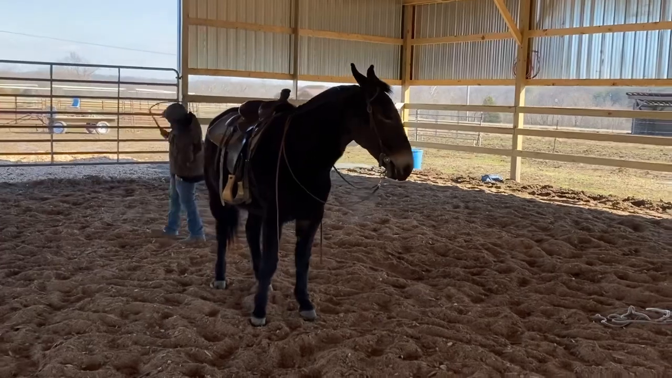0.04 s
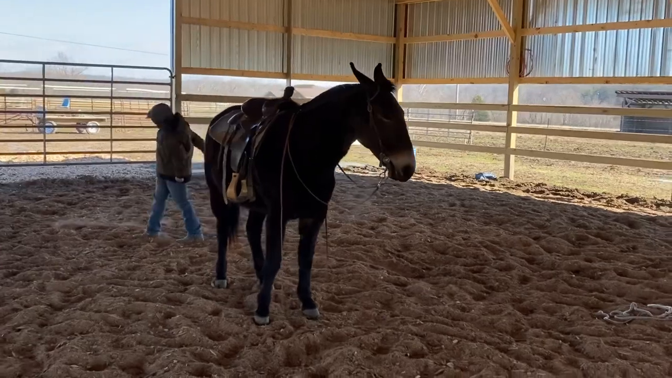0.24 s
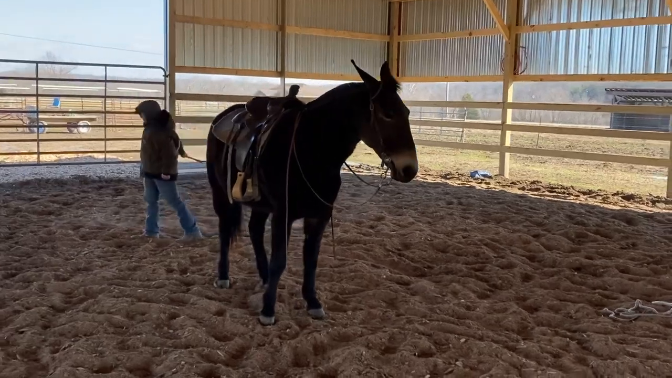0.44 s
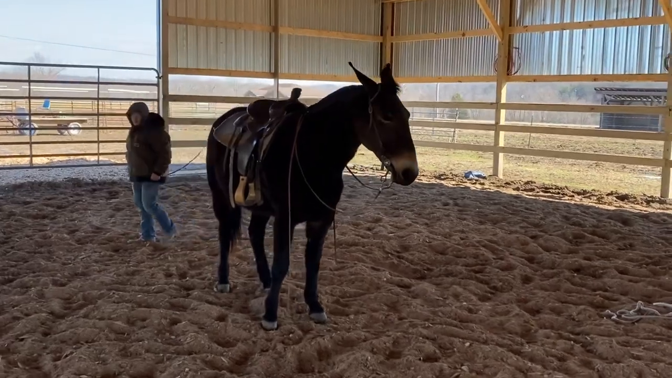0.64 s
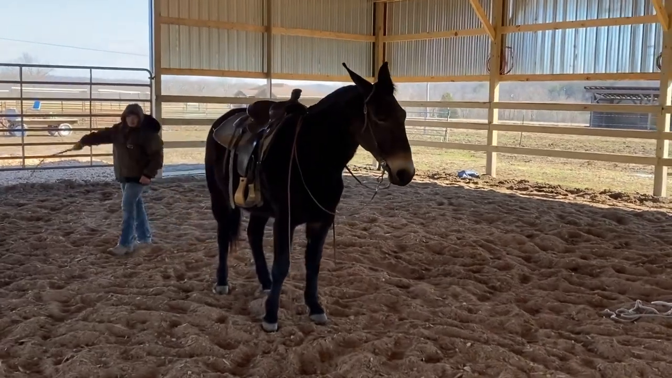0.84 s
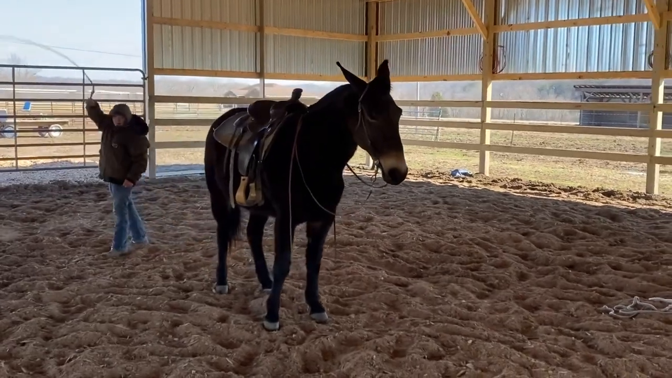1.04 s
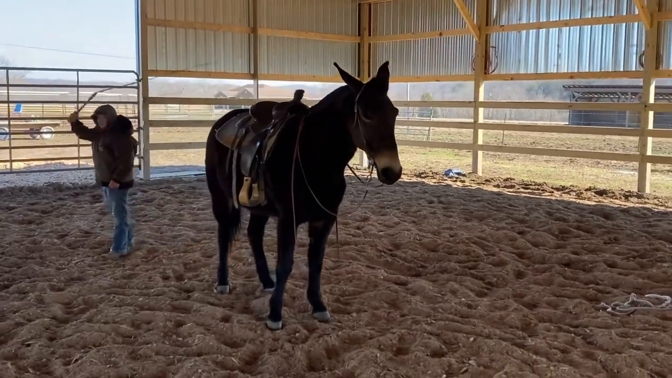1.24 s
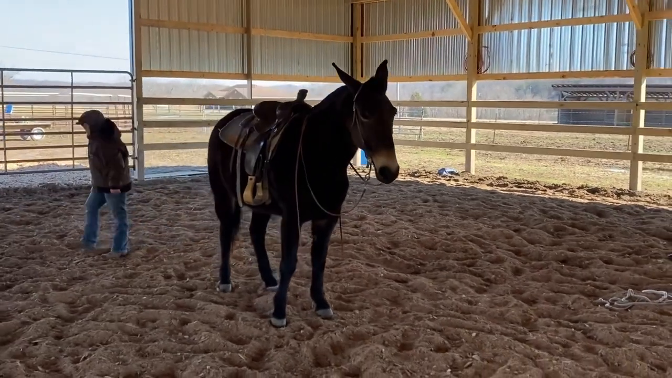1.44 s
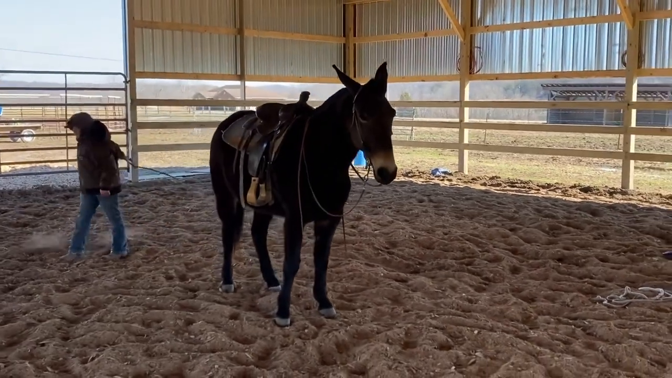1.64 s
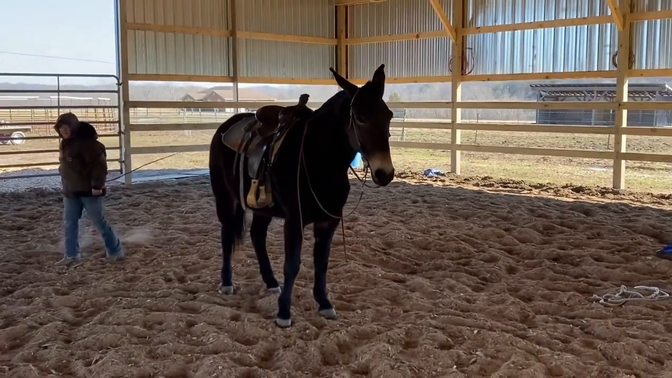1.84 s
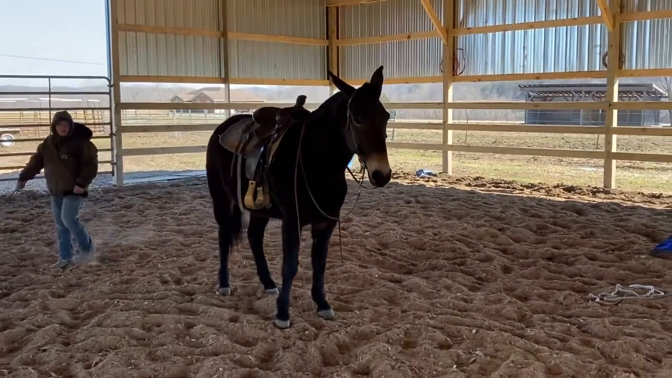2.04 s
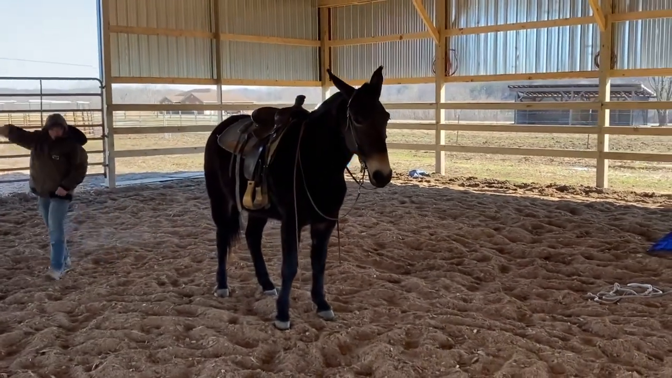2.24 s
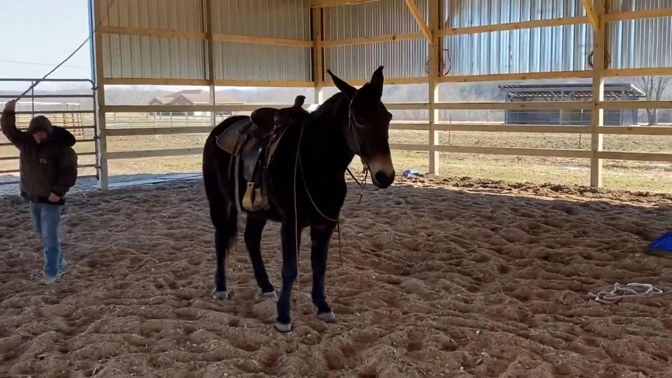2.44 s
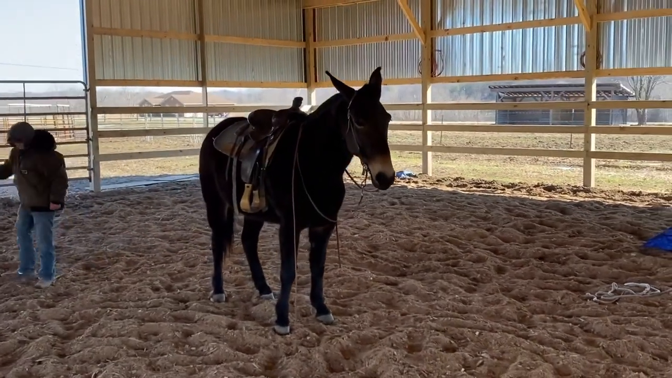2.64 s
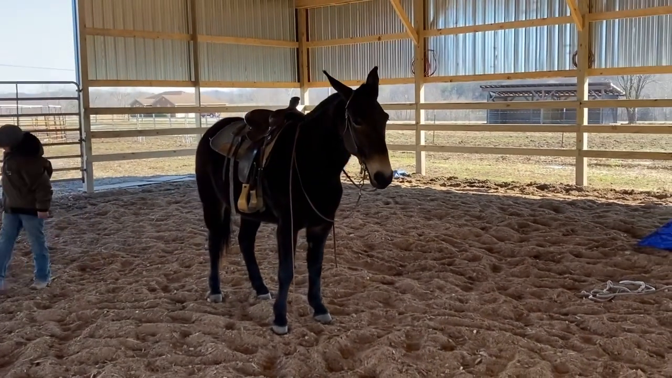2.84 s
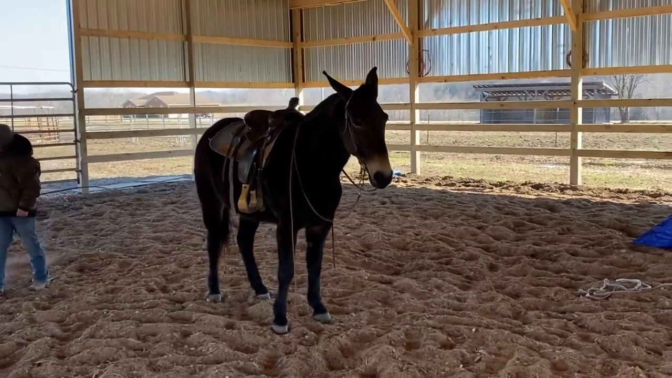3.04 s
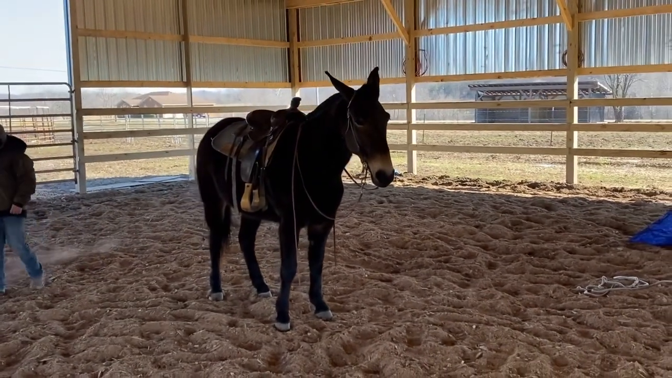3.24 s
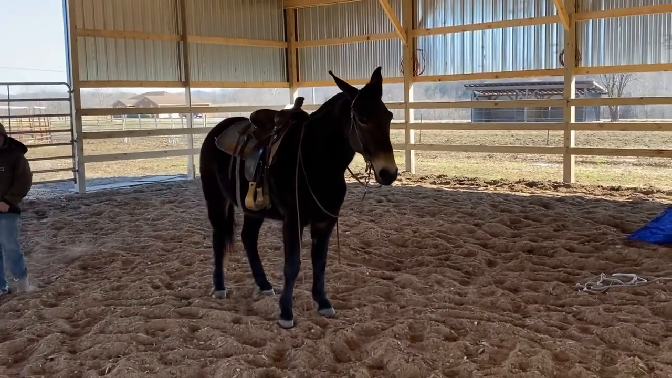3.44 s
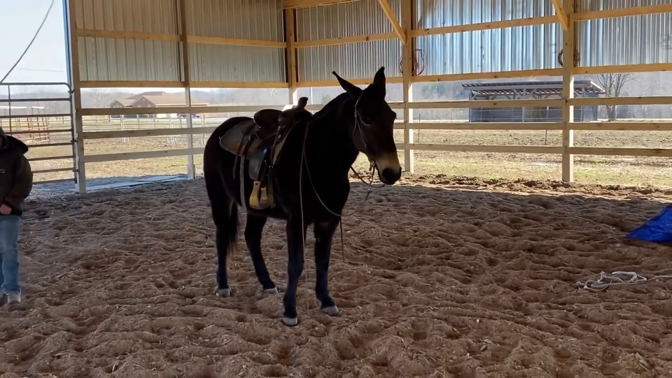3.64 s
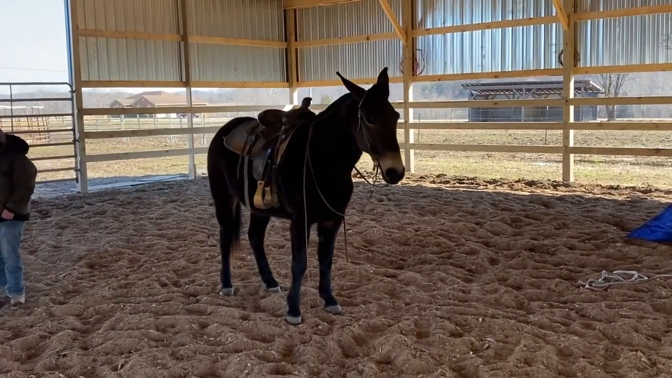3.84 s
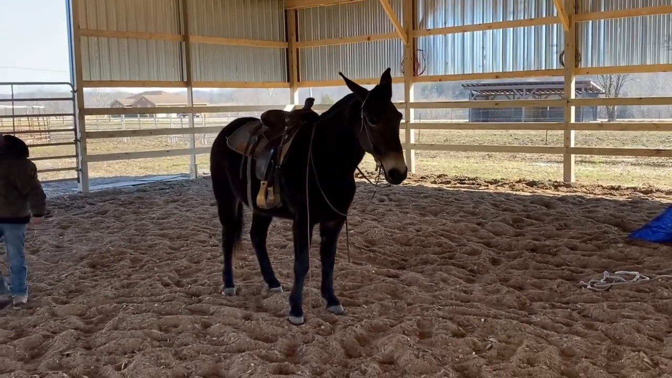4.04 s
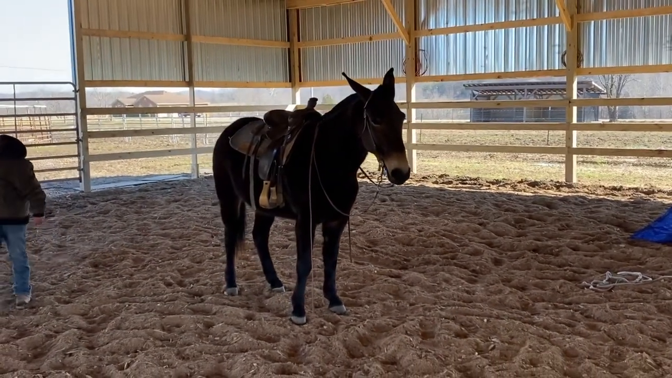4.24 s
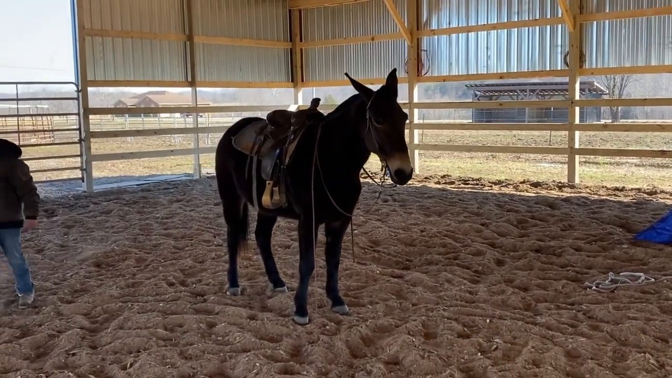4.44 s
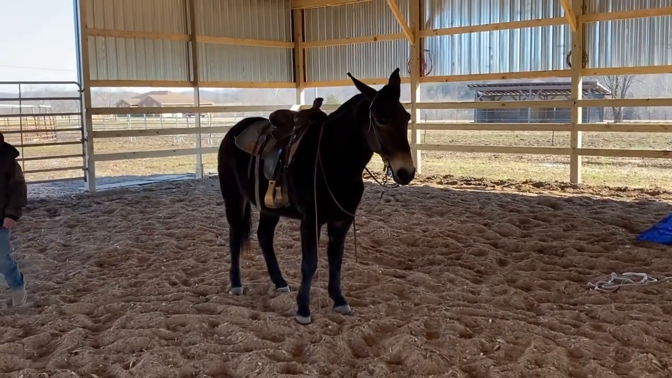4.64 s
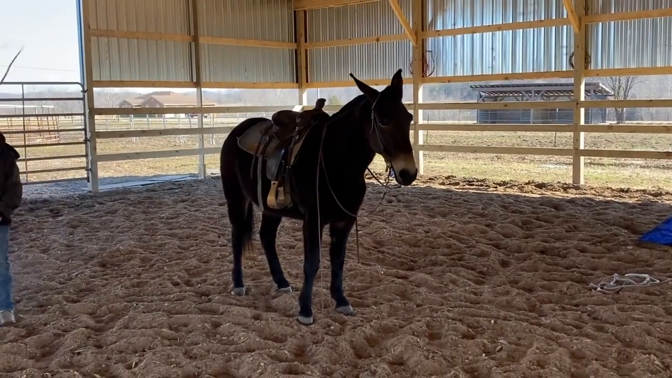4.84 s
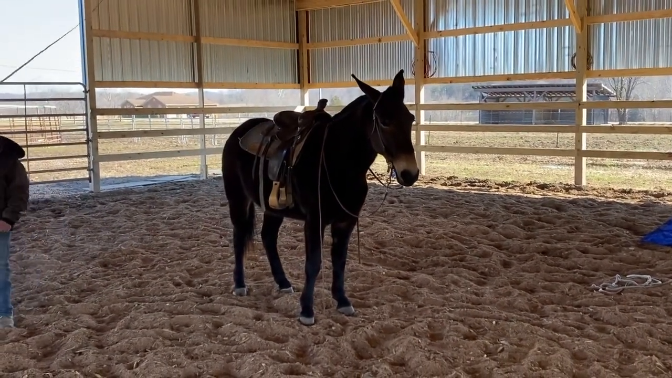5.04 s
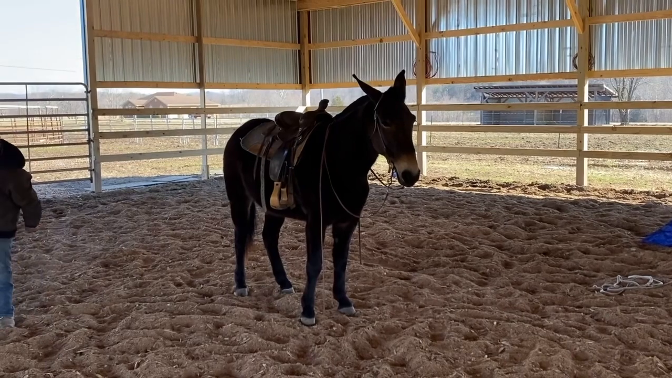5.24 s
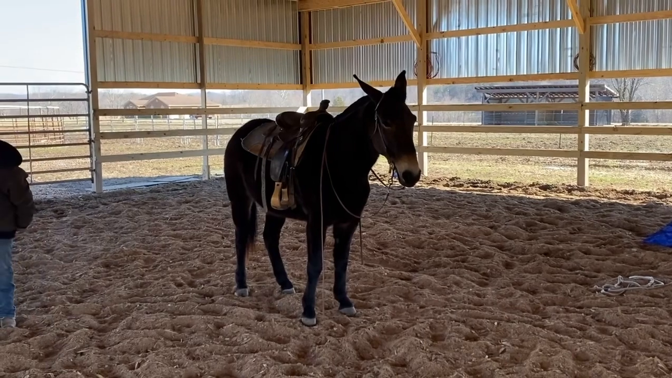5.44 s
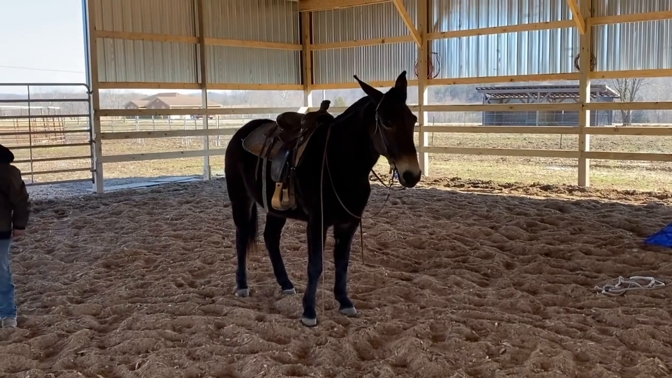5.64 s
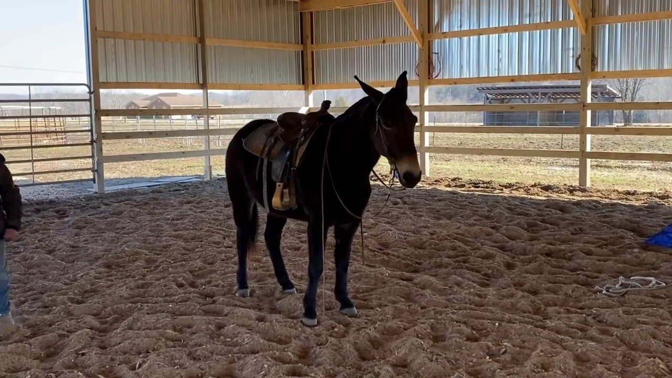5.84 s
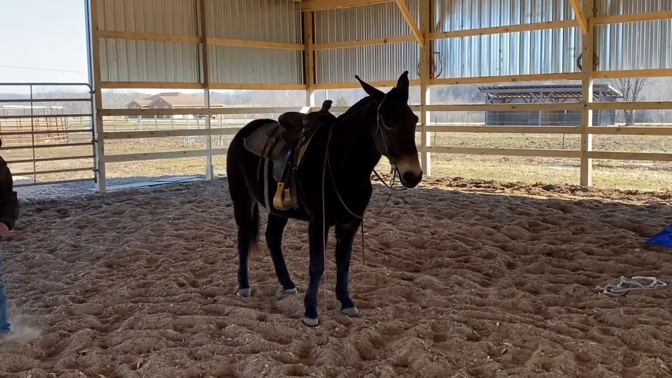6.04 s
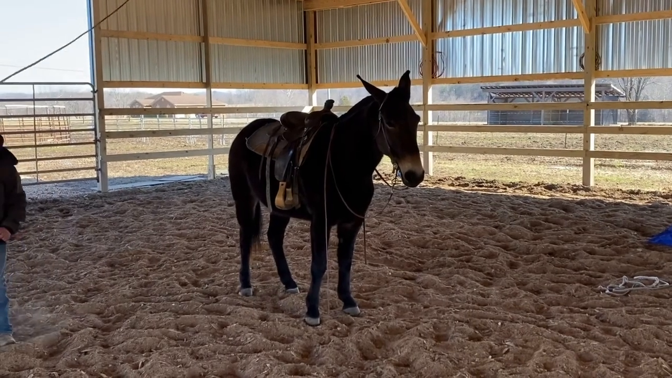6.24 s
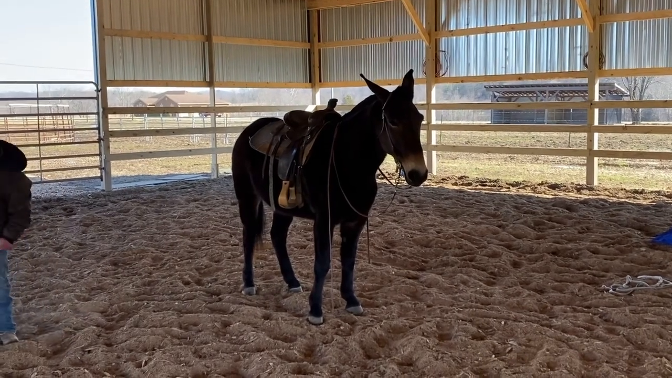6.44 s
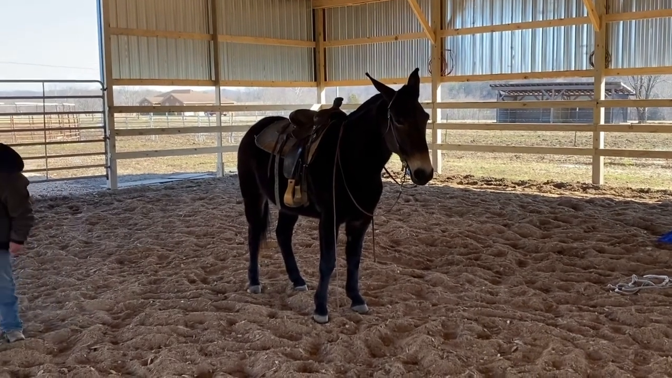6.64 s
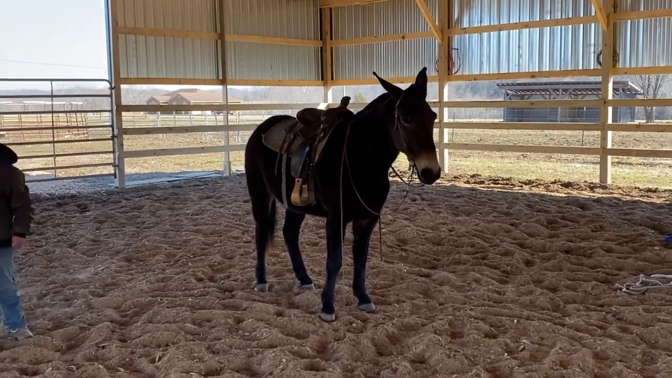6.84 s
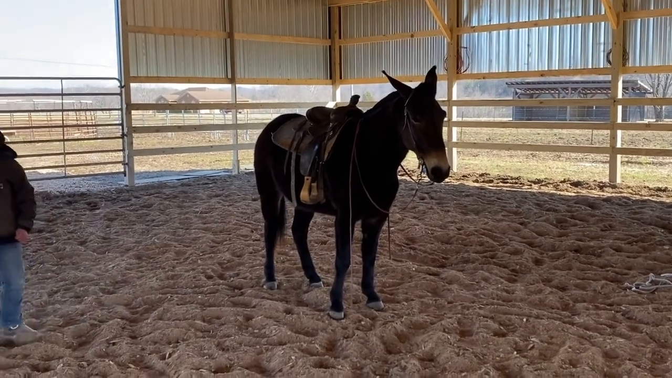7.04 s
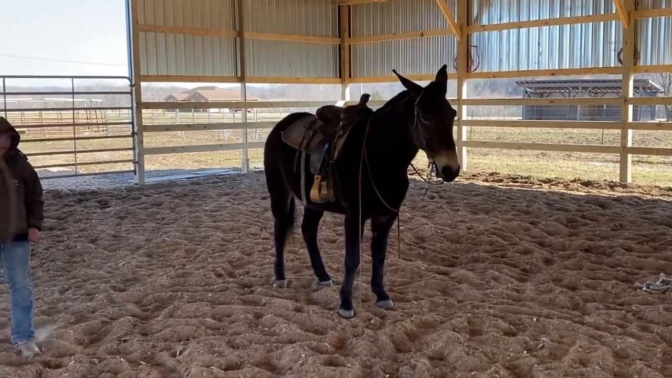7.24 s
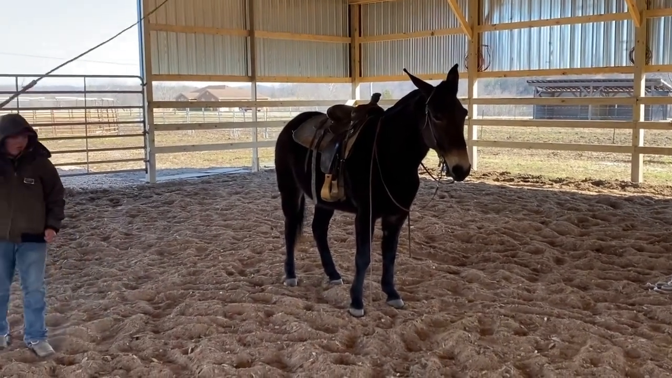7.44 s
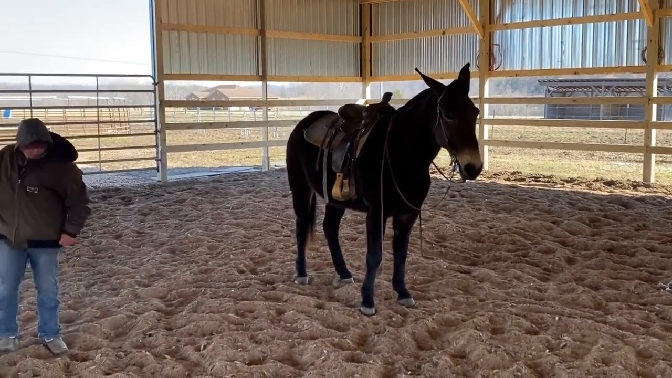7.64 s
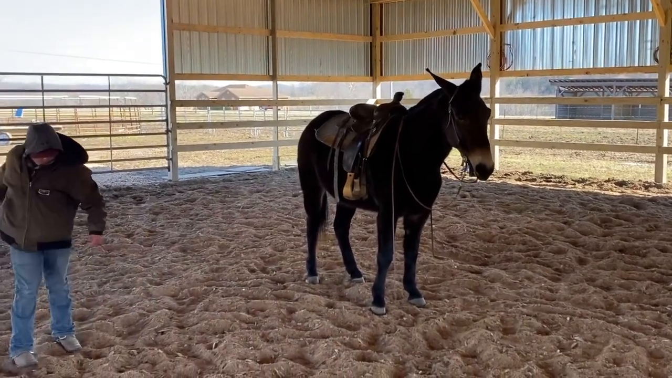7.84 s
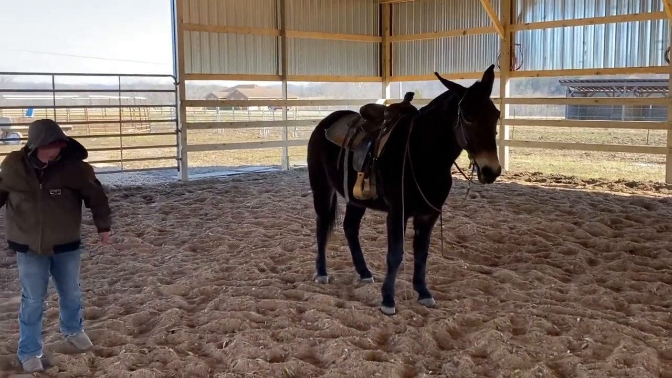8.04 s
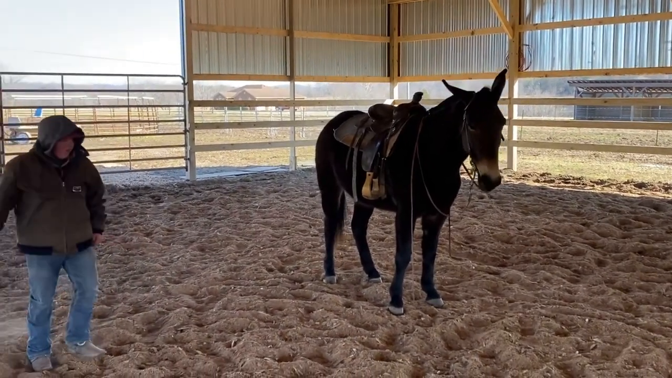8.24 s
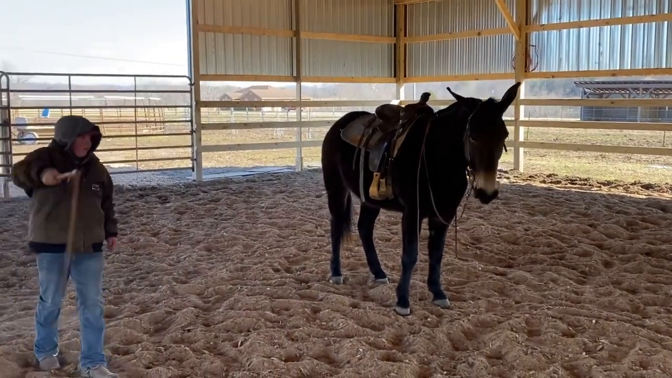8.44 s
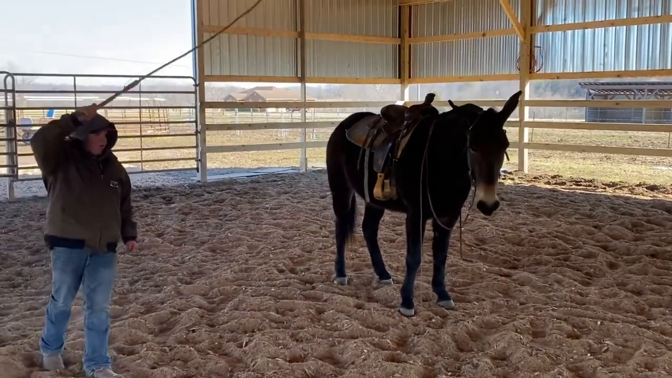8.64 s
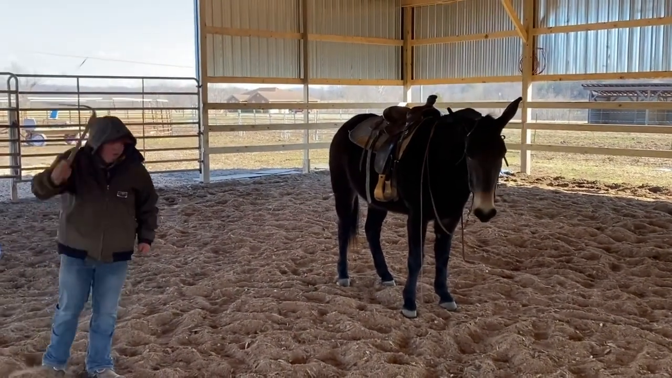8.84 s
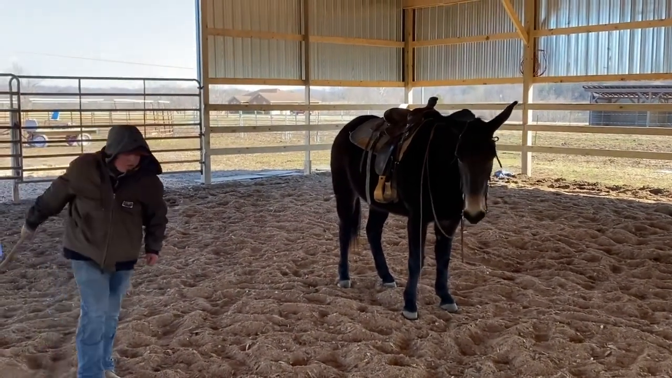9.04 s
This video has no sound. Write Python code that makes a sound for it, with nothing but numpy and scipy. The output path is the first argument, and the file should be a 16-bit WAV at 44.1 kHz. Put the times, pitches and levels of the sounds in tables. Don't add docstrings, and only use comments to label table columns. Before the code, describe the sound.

In an open-sided riding arena with a metal roof, a backswing swish is under way and leads to a loud whip crack at 0.16 seconds, with rapid echoes and a bright ring. A light flick follows at 0.84, a soft whoosh, then a double-edged crack at 1.41. The cycle repeats: flick at 2.1, crack at 2.74 with a heavy sand thump; flick at 3.4, crack at 3.97 with the deepest thump; faint flick at 4.64, brighter split crack at 5.25; flick at 5.95, crack at 6.51; dull flick at 7.12, crack at 7.72; faintest flick at 8.37, longer hiss and clustered crack at 8.97. Each ring returns in waves off walls and roof, fading within about half a second. Tiny grit ticks, low wind puffs, strongest near 3.2 to 3.5, and faint rural hush lie underneath.

```python
import sys
import numpy as np
from scipy import signal
from scipy.fft import rfft, irfft, next_fast_len
from scipy.io import wavfile
from scipy.ndimage import uniform_filter1d, map_coordinates

SR = 44100
rng = np.random.default_rng(int(sys.argv[2]) if len(sys.argv) > 2 else 0)


def makeup_ratio(level_db):
    decades = np.asarray(level_db, float) / 20
    return 10 ** decades


def inscribe(sig):
    pcm = np.round(np.clip(np.atleast_2d(sig).T, -1, 1) * 32767)
    wavfile.write(sys.argv[1], SR, pcm.astype(np.int16))


N = 401310
STEP = 32


def at_hz(points, hz):
    table_hz, value = np.transpose(points)
    return np.interp(np.log(hz + 1), np.log(table_hz + 1), value)


def over_time(points):
    return np.interp(np.arange(N) / SR, *np.transpose(points))


def rms_one(x):
    return x / np.sqrt(np.mean(x ** 2) + 1e-20)


def band(x, low_hz, high_hz):
    return signal.sosfilt(signal.butter(2, [low_hz, high_hz], "band", fs=SR, output="sos"), x)


def drift(rate_hz):
    knots = rng.standard_normal(int(N / SR * 60))
    at = np.arange(0, N + STEP, STEP)
    return np.interp(np.arange(N), at, map_coordinates(knots, [at / SR * rate_hz], order=3))


def add(out, s, sound):
    i = round(s * SR)
    out[..., i:i + sound.shape[-1]] += sound[..., :N - i]


# [f/Hz, level/dB per Hz]
HUSH_COLOUR = [(88, -32), (150, -5.5), (595, -4.5), (1090, -14), (7130, -23), (8330, -28), (9180, -29),
               (10700, -19), (13300, -27), (15500, -25.5)]
# [t/s, level/dB]
HUSH_SWELL = [(.75, 3), (1.15, -4), (1.35, -4), (2.05, 0), (2.4, -1), (2.65, -1), (3.7, -1), (3.9, 0),
              (4.58, 4), (4.93, -3), (5.12, -1), (5.75, 0), (5.9, -3), (6.0, 1), (6.1, 1), (6.25, 1),
              (6.35, 1), (7.4, -1), (7.62, -2), (8.68, -2), (8.85, 1)]


def hush():
    hz = np.fft.rfftfreq(N, 1 / SR)
    level_db = -70 + over_time(HUSH_SWELL) + 2.8 * drift(7)
    spectrum = rfft(rng.standard_normal((2, N))) * makeup_ratio(at_hz(HUSH_COLOUR, hz)) * (hz > 150)
    return makeup_ratio(level_db) * rms_one(irfft(spectrum, N))


# [t/s, level/dB]
BREEZE = [(0.0, -50), (0.81, -66), (1.65, -65), (1.8, -67), (2.69, -62.5), (2.84, -54.5), (3.83, -56.5),
          (4.05, -54), (4.54, -61), (5.22, -67), (5.37, -57), (5.78, -63), (6.44, -58.5), (6.59, -54.5),
          (7.5, -67.5), (7.91, -66.5), (8.06, -69), (9.1, -68)]


def breeze():
    rumble = rms_one(band(band(rng.standard_normal((2, N)), 33, 130), 33, 99))
    return makeup_ratio(over_time(BREEZE) + 2.5 * drift(14)) * rumble


# [start t/s, length/s, level/dB and eddy f/Hz at full speed]
BACKSWINGS = [
    (-.2, 0.36, -52.5, 597),
    (.88, 0.57, -61, 780),
    (2.14, 0.51, -64, 750),
    (3.42, 0.23, -61, 604),
    (3.57, 0.39, -65, 700),
    (4.72, 0.45, -70.5, 708),
    (5.97, 0.52, -66, 891),
    (7.149, 0.38, -68, 750),
    (8.42, 0.4, -67.5, 750),
]
# [start t/s, length/s, level/dB and eddy f/Hz at full speed]
DOWNSWINGS = [
    (.0, 0.16, -58, 700),
    (1.24, 0.24, -56.5, 650),
    (2.52, 0.46, -56.5, 650),
    (3.8, .17, -59.5, 650),
    (5.05, 0.22, -65, 650),
    (6.33, 0.41, -60.5, 600),
    (7.53, 0.39, -62.5, 650),
    (8.78, 0.37, -58, 700),
    (8.55, .5, -69, 520),
]


def whoosh(t, hz, wander, lumps):
    power = np.zeros(len(t))
    swings = [r + (1, .45) for r in BACKSWINGS] + [r + (.55, 1) for r in DOWNSWINGS]
    slowest = .6
    for s, length, level_db, top_hz, arc, skew in swings:
        now = (t >= s) & (t < s + length)
        speed = np.sin(np.pi * arc * ((t[now] - s) / length) ** skew).clip(0)
        eddy_hz = top_hz * (slowest + (1 - slowest) * speed)
        octaves = np.log2(hz / eddy_hz) + .1 * wander[now]
        eddies_db = np.where(octaves < 0, 5 * octaves, -28 * octaves)
        air_hiss_db = -19.5 - 2.5 * octaves.clip(0)
        colour = makeup_ratio(eddies_db) ** 2 + makeup_ratio(air_hiss_db) ** 2
        power[now] += makeup_ratio(level_db) ** 2 * speed ** 3.7 * colour
    return power * makeup_ratio(1.6 * lumps) ** 2


# [t/s, near level/dB, far level/dB, far delay/s, brightness/dB per octave]
LASH_RINGS = [
    (.168, -21.5, -44.5, 0.19, -0.3),
    (1.428, -26.5, -43.5, .18, -0.4),
    (2.756, -30.5, -42, .19, -0.63),
    (3.988, -31.5, -43.5, 0.16, -0.5),
    (5.267, -35, -42.5, 0.15, 0.46),
    (6.526, -31, -46, 0.14, -0.8),
    (7.732, -34.5, -44.5, 0.13, -0.45),
    (8.992, -37, -44.5, 0.13, 0.3),
]
SCATTERS_DB = [-27, -20.5, -24.5, -25, -30.5, -25, -29, -35]
# [t/s, level/dB,
# brightness/dB per octave]
FLICK_RINGS = [(0.001, -72, -2), (0.852, -62, -0.2), (.975, -70.5, -5), (2.128, -62, 2), (2.242, -70.5, -4),
               (3.394, -61, 0.8), (3.497, -66, -4), (4.646, -62, 2), (4.76, -67, -3), (5.949, -62, -2),
               (6.04, -72, -3), (2.3, -75, -3), (7.125, -66.5, -0.9), (7.24, -72, -4.5), (8.369, -67, -1.1),
               (8.485, -71.5, -5)]
# [f/Hz, level/dB per third octave]
SCATTER = [(170, -16), (300, -12.5), (700, -13), (1200, -6.5), (2300, 2), (4000, -1), (6500, -7),
           (12000, -14)]
NEAR = [(200, -23.5), (700, -16), (1200, -8.5), (2300, 1), (4000, 0), (5600, -5.5), (8000, -4.5),
        (12000, -7.5)]
FAR = [(200, -22), (700, -11), (1200, -6.5), (2300, -0.5), (4000, -2), (5600, -9.5), (8000, -11.5),
       (12000, -17)]
FLICK_FIELD = [(170, -11.5), (300, -6), (700, -3), (1200, -2.5), (2300, -0.5), (4000, -2), (6500, 1),
               (12000, 2)]
# [f/Hz, t60/s]
NEAR_T60 = [(300, 0.93), (1000, 0.7), (3000, .55), (7000, .48), (11000, .42), (15000, .4)]
FAR_T60 = [(300, 1), (1000, .78), (3000, .77), (5500, .68), (8000, .68), (11000, .63), (15000, .58)]
FLICK_T60 = [(300, .4), (1000, 0.25), (3000, 0.45), (7000, 0.41), (12000, .4)]
# [t after ring start/s, level/dB, spread/s]
WAVES = [
    (.088, 2.5, .013),
    (.14, -2, .025),
    (.21, 1.5, .03),
    (.345, 1.5, .012),
    (.41, -1.5, .04),
]


def ringing(t, hz):
    power = np.zeros(len(t))
    scatter_t60_s, far_rise_s, far_hold_s = .07, .038, .046
    for (s, near_db, far_db, far_s, bright_db), scatter_db in zip(LASH_RINGS, SCATTERS_DB):
        age = t[t >= s] - s
        scatter = makeup_ratio(scatter_db + at_hz(SCATTER, hz) - 60 * age / scatter_t60_s) ** 2
        near = makeup_ratio(near_db + at_hz(NEAR, hz) - 60 * age / at_hz(NEAR_T60, hz)) ** 2
        arrived = 1 / (1 + np.exp((far_s - age) / far_rise_s))
        far_age = (age - far_s - far_hold_s).clip(0)
        far = arrived * makeup_ratio(far_db + at_hz(FAR, hz) - 60 * far_age / at_hz(FAR_T60, hz)) ** 2
        waves_db = sum(db * np.exp(-((age - at) / spread) ** 2) for at, db, spread in WAVES)
        brightness = makeup_ratio(bright_db * np.log2(hz / 2500)) ** 2
        power[t >= s] += (far + (scatter + near) * brightness) * makeup_ratio(waves_db) ** 2
    for s, level_db, bright_db in FLICK_RINGS:
        fall_db = 60 * (t[t >= s] - s) / at_hz(FLICK_T60, hz)
        start_db = level_db + at_hz(FLICK_FIELD, hz) + bright_db * np.log2(hz / 2500)
        power[t >= s] += makeup_ratio(start_db - fall_db) ** 2
    return power


def clumped(white):
    spectra = signal.stft(white, nperseg=512)[2]
    patches = uniform_filter1d(rng.standard_normal(spectra.shape[-2:]), size=2, axis=0)
    patches = uniform_filter1d(patches, size=3, axis=1)
    return signal.istft(spectra * makeup_ratio(1.5 * rms_one(patches)), nperseg=512)[1][..., :N]


def arena():
    t = np.arange(0, N, STEP) / SR
    wander, lumps = drift(14)[::STEP], drift(30)[::STEP]
    white, flutter = clumped(rng.standard_normal((2, 2, N))), drift(45)
    out = 0
    for k, low in enumerate(140 * 2 ** (np.arange(21) / 3)):
        high = min(low * 2 ** (1 / 3), 16800)
        hz = np.sqrt(low * high)
        power = ringing(t, hz) + whoosh(t, hz, wander, lumps)
        gain = np.interp(np.arange(N) / SR, t, np.sqrt(power))
        patch_db = .5 * flutter + .55 * drift(18)
        out = out + gain * makeup_ratio(patch_db) * rms_one(band(white[k % 2], low, high))
    return out


# [start t/s, length/s, level/dB, top f/Hz]
PUFFS = [(.06, 0.096, -56, 130), (.8, 0.19, -57, 220), (1.074, 0.19, -52.5, 109), (1.552, 0.14, -55, 130),
         (2.053, .17, -54, 230), (3.2, 0.12, -47.5, 108.7), (3.327, 0.13, -49.5, 266),
         (3.461, .2, -48.5, 126), (4.619, 0.1, -54.5, 220), (5.94, .15, -55.5, 226),
         (6.137, 0.063, -54, 166), (7.081, .13, -52, 201), (7.333, 0.055, -56, 120),
         (8.251, 0.19, -60, 200), (8.695, 0.095, -60, 107)]


def puffs():
    out = np.zeros((2, N))
    for s, length, level_db, top_hz in PUFFS:
        noise = band(band(rng.standard_normal((2, SR // 2)), 40, top_hz), 30, top_hz)
        noise = noise[:, -int(length * SR):]
        swell = np.sin(np.pi * np.linspace(0, 1, noise.shape[1]))
        add(out, s, makeup_ratio(level_db) * rms_one(noise) * swell)
    return out


# [crack t/s, level/dB at crack, build-up/ms]
RUSHES = [
    (.1565, -40, 5),
    (1.4124, -38, 8),
    (2.7421, -36, 7),
    (3.9732, -36, 7),
    (5.25, -38, 8),
    (6.511, -36, 8),
    (7.7153, -38, 8),
    (8.972, -34, 11),
]


def rushes():
    out, ms = np.zeros(N), np.arange(-1200, 0) / SR * 1000
    for s, level_db, build_ms in RUSHES:
        white = rng.standard_normal((3, len(ms)))
        hiss = rms_one(band(white[0], 700, 4500))
        hiss += makeup_ratio(-15) * rms_one(band(white[1], 4000, 15000))
        hiss += makeup_ratio(-6) * rms_one(band(white[2], 120, 700))
        swell = np.exp(ms / build_ms) * np.tanh((ms - ms[0]) / 6) ** 2
        add(out, s - len(ms) / SR, makeup_ratio(level_db) * swell * hiss)
    return out


# [t/s, peak level/dB, top octave/dB, lead-in hiss/dB, build-up/ms]
SNAPS = [(0.1565, -7.1, -11.4, -17.0, 1.4), (1.4124, -3.3, -13.9, -24.0, 1.9),
         (1.4186, -8, -10.5, -17.0, 1.5), (2.7421, -2.7, -12.3, -21.0, 2.5),
         (3.9732, -2.2, -15.4, -25.0, 4), (5.248, -24.0, -26.0, -16.0, 5),
         (5.2521, -5.0, -14.4, -17.0, 2.5), (5.2539, -10.1, -27.3, -1.0, 2.5),
         (6.511, -3.4, -14.7, -23.0, 2.5), (7.7153, -3.4, -13.7, -18.0, 2.5),
         (7.7169, -12, -25.5, -7.0, 1.8), (8.9729, -10, -25.3, -14.0, 2.5),
         (8.9745, -6.5, -14.0, -14.0, 2.5), (8.9769, -9, -19.0, -12.0, 2.5)]
# [t/s, peak level/dB, top octave/dB, lead-in hiss/dB]
ECHOES = [(0.162, -4, -14.9, -22.0), (0.1701, -5, -15.5, -15.0), (1.4178, -9.0, -12.0, -20.0),
          (1.4202, -10.0, -18.0, -9.0), (1.4228, -12.0, -20.0, -9.0), (1.4312, -7.0, -20.0, -9.0),
          (.1654, -10.0, -18.0, -14.0), (1.4258, -7.0, -12.0, -12.0), (1.4277, -5.5, -21.9, -9.0),
          (1.4335, -8.0, -20.0, -9.0), (2.756, -5.6, -22.2, -21.0), (3.9892, -10, -20.0, -11.0),
          (5.2672, -13.4, -19.2, -20.0), (6.5264, -8.0, -21.7, -10.0), (7.7317, -14.6, -13.6, -15.0),
          (8.993, -17.4, -16.3, -16.0)]
# [t/s, peak level/dB, top octave/dB, build-up and fade/ms]
FLICKS = [
    (0.8398, -36.5, -2, 0.99),
    (2.1136, -35.5, 3.5, 5.2),
    (2.13, -40.5, -2, 2.6),
    (3.3895, -38, -1.5, 2.6),
    (4.6412, -41, 4, 2.1),
    (5.9476, -37, -2, 1.5),
    (7.119, -39, -5.5, 2.9),
    (8.3689, -45, -3.5, 2.6),
]
# [f/Hz, level/dB per Hz]
SNAP_COLOUR = [(300, -14), (600, -4.5), (1200, -3.5), (2300, 2), (4000, -6), (6000, -12), (7500, -18.5)]


def snaps():
    half = 1024
    out, t_ms = np.zeros((2, N)), np.arange(-half, half) / SR * 1000
    hz = np.fft.rfftfreq(len(t_ms), 1 / SR)
    click = np.cos(2 * np.pi * 4.2 * t_ms + .6) * np.exp(-(t_ms / .14) ** 2)
    top_click = np.cos(2 * np.pi * 12 * t_ms) * np.exp(-(t_ms / .1) ** 2)
    # fade/ms, output row
    cracks = [r + (.9, 0) for r in SNAPS]
    cracks += [r + (1.0, 2.5, int(r[0] > 2)) for r in ECHOES]
    cracks += [(s, db, top, -19, ms, ms, 0) for s, db, top, ms in FLICKS]
    for s, peak_db, top_db, lead_db, build_ms, fade_ms, row in cracks:
        white = rng.standard_normal((2, len(t_ms)))
        tilt = (hz / 3000) ** np.clip((top_db + 15) / 9, 0, .4)
        colour = tilt * makeup_ratio(at_hz(SNAP_COLOUR, hz)) * (hz > 250) * (hz < 8000)
        body = rms_one(irfft(rfft(white[0]) * colour))
        hiss = body + makeup_ratio(top_db + .5) * rms_one(band(white[1], 7600, 14000))
        lead_in = makeup_ratio(lead_db) * np.exp(t_ms / build_ms)
        torn_air = makeup_ratio(-10) * np.exp(-t_ms / fade_ms)
        shape = np.where(t_ms < 0, lead_in, torn_air)
        spray = makeup_ratio(-22) * (t_ms > 0) * np.exp(-t_ms / 13)
        crack = shape * hiss + .9 * click + makeup_ratio(top_db + 7) * top_click
        add(out[1], s - half / SR, makeup_ratio(peak_db) * spray * hiss)
        add(out[row], s - half / SR, makeup_ratio(peak_db) * crack)
    return out


# [t/s, main crest delay/ms, level/dB, fade/ms, late swell/dB]
THUMPS = [(0.1555, 2.2, -11, 5, -62.5), (0.168, 3.4, -12, 4.9, -66), (0.5163, 7, -44, 30, -81),
          (1.4134, 2.7, -12.5, 6.1, -55.5), (1.4253, 2.8, -19, 5, -71), (2.7422, 3.1, 0, 10.5, -37),
          (3.064, 4.9, -32, 24, -70), (3.9731, 3.25, 1.5, 7.6, -38), (4.765, 5.3, -38, 15, -72),
          (5.2527, 1.8, -5.5, 6.8, -44), (6.5112, 3.0, -.3, 9, -37.5), (6.8708, 7.3, -38.5, 41, -74),
          (7.0222, 11, -37.5, 24, -65), (7.7153, 2.2, -7.5, 5.0, -52.5), (8.9748, 1.75, -7.5, 4.2, -59)]


def thumps():
    out, t = np.zeros(N), np.arange(1, int(.4 * SR)) / SR
    swell = np.cos(2 * np.pi * 47 * t) * np.exp(-((t - .172) / .075) ** 4 / 2)
    for s, crest_ms, level_db, fade_ms, swell_db in THUMPS:
        age = t * 1000 / crest_ms
        build = 1 - np.exp(-(age / .63) ** 3)
        wave = np.cos(np.pi * np.log(age) / np.log(1.8)) * build
        fade = np.exp(-(t * 1000 / fade_ms) ** 1.2)
        add(out, s, makeup_ratio(level_db) * wave * fade + makeup_ratio(swell_db) * swell)
    return out


# [t/s, length/s, first f/Hz, last f/Hz,
# level/dB]
EDDY_TONES = [
    (8.968, .0105, 2300, 2500, -14),
    (6.53, .01, 1500, 1500, -21),
    (6.3, .1, 2200, 2200, -80),
    (5.08, .07, 2000, 2000, -76),
    (5.2445, .008, 1400, 1700, -20),
              (8.62, .13, 2250, 2400, -80), (8.69, .05, 1600, 1600, -79), (4.635, .02, 2000, 2000, -54),
          (4.655, .02, 2200, 2150, -59), (1.06, .08, 550, 550, -60), (8.474, .026, 720, 1020, -49),
          (8.49, .035, 1000, 1130, -53), (8.5, .05, 1200, 1500, -62), (8.442, .035, 260, 380, -55),
          (8.475, .035, 310, 270, -59), (8.485, .035, 600, 600, -60), (8.55, .095, 2750, 2100, -66),
          (7.228, .03, 800, 1000, -57), (7.237, .022, 1850, 2200, -59), (7.245, .05, 700, 680, -60),
          (7.25, .03, 1300, 1300, -64), (7.26, .04, 2950, 3300, -60), (7.29, .08, 3250, 3100, -74),
          (7.545, .06, 1450, 1450, -73), (8.53, .09, 1300, 700, -66), (4.765, .035, 1250, 1400, -62),
          (4.79, .1, 1200, 1100, -68), (4.83, .07, 850, 680, -63), (1.13, .1, 2300, 2250, -71),
          (3.505, .04, 1200, 1400, -62), (3.55, .09, 1400, 1450, -70), (6.06, .14, 1080, 970, -62),
          (6.03, .07, 2050, 2000, -68), (6.055, .14, 700, 680, -64), (2.225, .04, 2200, 2300, -64),
          (2.23, .06, 1200, 950, -62), (2.29, .07, 2100, 2050, -72), (2.6, .05, 330, 380, -61),
          (2.63, .075, 560, 500, -60), (1.205, .018, 4700, 4700, -68), (1.193, .012, 5300, 5300, -71),
          (1.345, .022, 5000, 4800, -66), (1.37, .016, 4800, 4800, -70)]
# [start t/s, f/Hz, level/dB]
THIN_TONES = [(1.385, 7800, -52), (1.385, 4100, -52), (1.38, 4900, -56), (2.716, 7000, -63),
              (6.488, 7900, -48), (3.95, 3270, -37), (3.952, 1950, -41), (3.95, 1400, -39),
              (3.95, 6780, -44), (3.954, 6200, -52.5), (5.23, 6280, -51), (5.227, 3920, -37),
              (5.23, 1487, -37), (5.232, 897, -46), (6.488, 2800, -51), (6.486, 1630, -43),
              (6.487, 3430, -42), (6.488, 6800, -44), (7.685, 1550, -52), (7.686, 1000, -57),
              (8.944, 1400, -52), (7.688, 8070, -60.5), (8.941, 2383, -47), (8.939, 4400, -56),
              (8.936, 8000, -63)]
# [t/s, length/s, f/Hz, level/dB]
SWING_TAILS = [
    (4.92, .24, 720, -69),
    (7.37, .15, 700, -68),
    (8.6, .22, 620, -70),
    (2.3, .15, 1050, -71),
    (2.33, .12, 520, -66),
]
# [t/s, length/s, level/dB]
WHISTLES = [
    (0.565, 0.093, -79),
    (1.345, .06, -79),
    (3.047, 0.12, -82),
    (6.08, 0.2, -83.5),
    (7.198, 0.19, -85),
    (8.205, .14, -79),
]


def swishes():
    out = np.zeros(N)
    # width/Hz, glides smear wider
    tones = [r + (55 + .02 * abs(r[3] - r[2]),) for r in EDDY_TONES]
    tones += [(s, .04, hz, hz, db, 2) for s, hz, db in THIN_TONES]
    tones += [(s, length, hz, hz, db, 55) for s, length, hz, db in SWING_TAILS]
    tones += [(s, length, 11100, 11100, db, 30) for s, length, db in WHISTLES]
    for s, length, first_hz, last_hz, level_db, width_hz in tones:
        u = np.linspace(0, 1, int(length * SR))
        hz = first_hz + (last_hz - first_hz) * np.sin(np.pi * u / 2)
        pole = np.exp(-np.pi * width_hz / SR)
        eddies = signal.lfilter([1], [1, -pole], rng.standard_normal((2, SR // 3)))[:, -len(u):]
        phase = 2 * np.pi * np.cumsum(hz) / SR
        tone = rms_one(eddies[0] * np.cos(phase) + eddies[1] * np.sin(phase))
        add(out, s, makeup_ratio(level_db) * np.sin(np.pi * u) * tone)
    return out


# [t/s, peak level/dB, f/Hz]
TICKS = [(.84, -42, 600), (2.113, -42, 600), (3.39, -43, 600), (5.946, -41, 480), (7.12, -45, 800),
         (8.367, -47, 600), (5.885, -52, 400), (0.701, -57.5, 7000), (.785, -63.5, 6950),
         (1.064, -59, 5880), (3.498, -50, 2790), (3.626, -48, 1500), (7.238, -53, 1000), (4.766, -50, 3000),
         (4.766, -52, 6500), (4.786, -55, 5500), (.982, -58, 2800), (8.805, -67, 3000), (5.146, -51, 1000),
         (8.984, -28, 6000), (3.979, -20.5, 5000), (6.5182, -21, 4505), (1.213, -65, 5500),
         (1.36, -65, 5200), (1.347, -66, 5800), (5.9555, -48, 6000), (8.485, -56, 900), (.714, -64, 8000)]


def ticks():
    out, t = np.zeros(N), np.arange(400) / SR
    for s, peak_db, hz in TICKS:
        contact = rng.standard_normal(len(t)) * np.exp(-t / .0025)
        add(out, s, makeup_ratio(peak_db) * band(contact, hz * .65, hz * 1.5) * 2)
    return out


# [f/Hz, lead/rad]
PORT_PHASE = [(60, 1.2), (250, 2), (550, .9), (1000, 1.5), (1400, 2.7), (2000, 1.6), (15000, 1.6)]
# [f/Hz, share]
DIFFUSE = [(60, .3), (250, .35), (600, .9), (1200, .85), (2000, .6), (9000, .55), (15000, .6)]
# [f/Hz, level/dB]
WIDTH = [(60, -11), (250, -11), (520, -5), (860, -1.5), (1300, 2), (1600, .5), (2000, -9), (2400, -15),
         (7000, -8), (8000, 1), (15000, 1)]
# [low f/Hz, high f/Hz]
SUM_GAPS = [(8700, 9580), (12820, 13700), (15820, 23000)]
DIFFERENCE_GAPS = [(2600, 7400), (10600, 11550), (14700, 23000)]


def ports(common, unlike, gap_db, wider):
    size = next_fast_len(N + 4096)
    hz = np.fft.rfftfreq(size, 1 / SR)
    common, unlike = rfft(common, size), rfft(unlike, size)
    share = np.clip(at_hz(DIFFUSE, hz), 0, 1)

    def open_in(gaps):
        inside = sum(np.tanh((hz - low) / 160) - np.tanh((hz - high) / 160) for low, high in gaps)
        return makeup_ratio(gap_db / 2 * inside)

    copy = np.sqrt(1 - share ** 2) * common * np.exp(1j * at_hz(PORT_PHASE, hz))
    width = makeup_ratio(at_hz(WIDTH, hz) + at_hz(wider, hz))
    total = irfft(common * open_in(SUM_GAPS), size)[:N]
    difference = irfft((copy + share * unlike) * width * open_in(DIFFERENCE_GAPS), size)[:N]
    return np.array([total + difference, total - difference])


# [f/Hz, level/dB]
DIRECT_WIDER = [(300, -.5), (800, 7), (2000, 5), (4000, 4), (15000, 2)]


def scene():
    field = arena() + breeze() + puffs() + hush() + swishes() * [[1], [0]]
    cracks, afterglow = snaps()
    direct = cracks + ticks() + thumps()
    late = afterglow + rushes()
    return (ports(*field, gap_db=-60, wider=[(1, 0)])
            + ports(direct, 0 * direct, gap_db=-9, wider=DIRECT_WIDER)
            + ports(late, 0 * late, gap_db=-60, wider=DIRECT_WIDER))


def band_limit(x):
    return signal.sosfilt(signal.butter(12, 16990, fs=SR, output="sos"), x)


def record(dry):
    dry = signal.sosfilt(signal.butter(2, 40, "high", fs=SR, output="sos"), dry)
    cut = signal.sosfilt(signal.cheby2(10, 60, 16900, fs=SR, output="sos"), dry)
    mix = 1.55 * np.tanh(cut / 1.606)
    return band_limit(mix)


dry = scene()
out = record(dry)
inscribe(out)
```